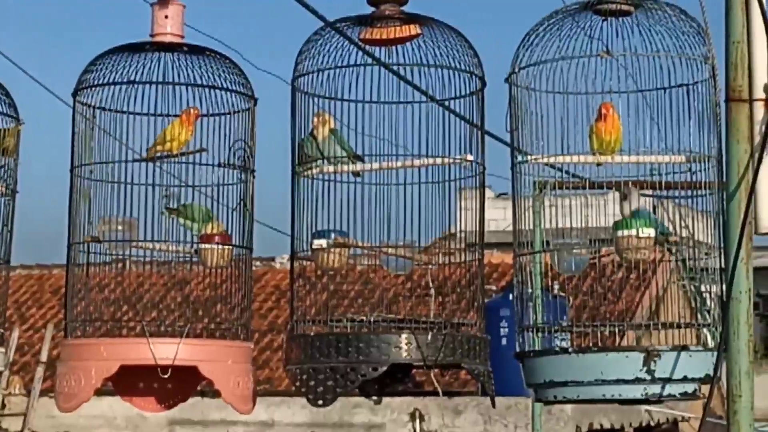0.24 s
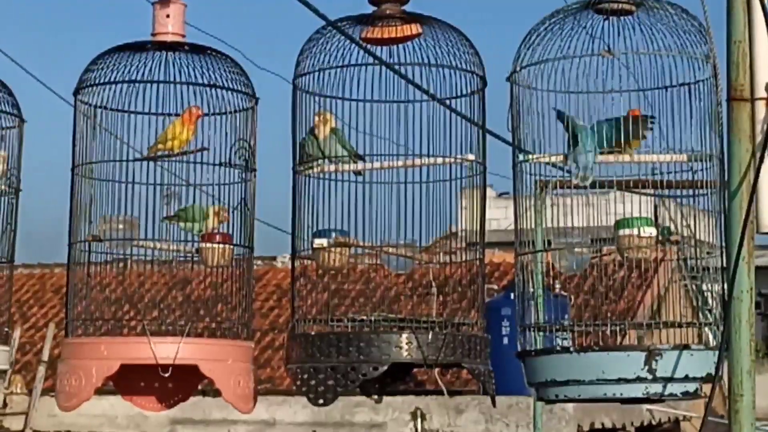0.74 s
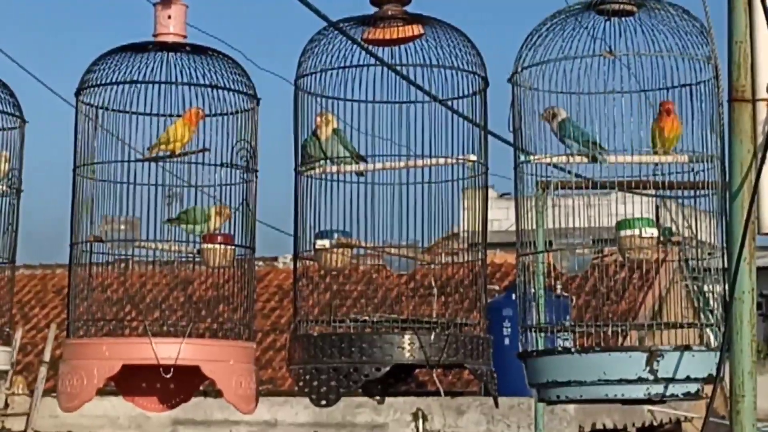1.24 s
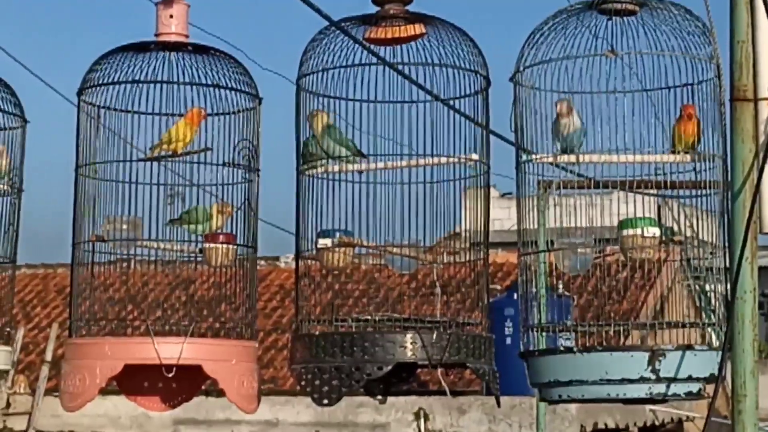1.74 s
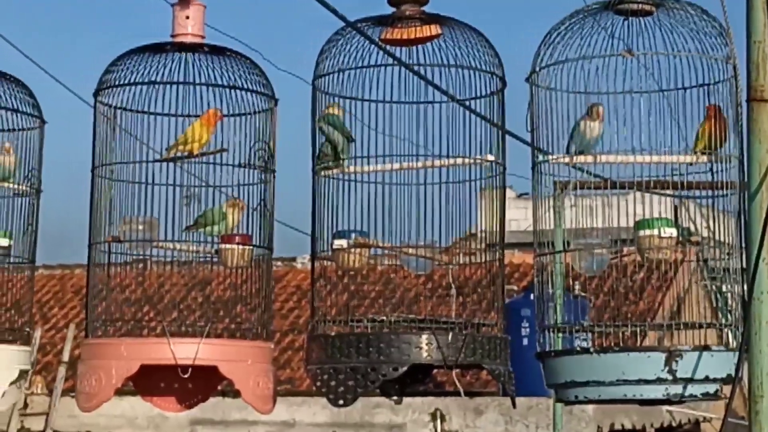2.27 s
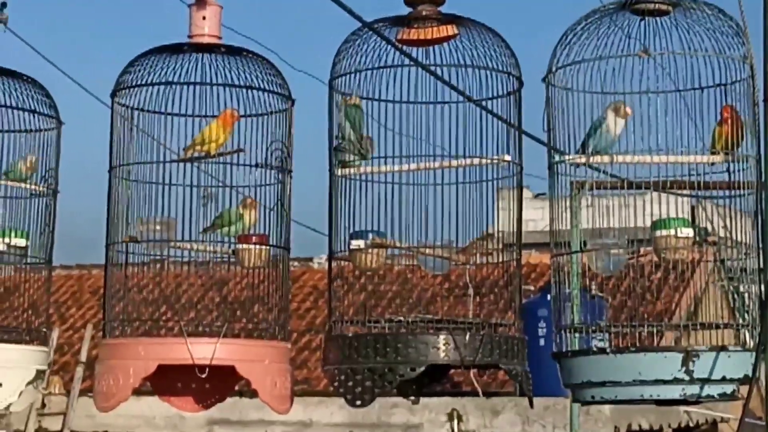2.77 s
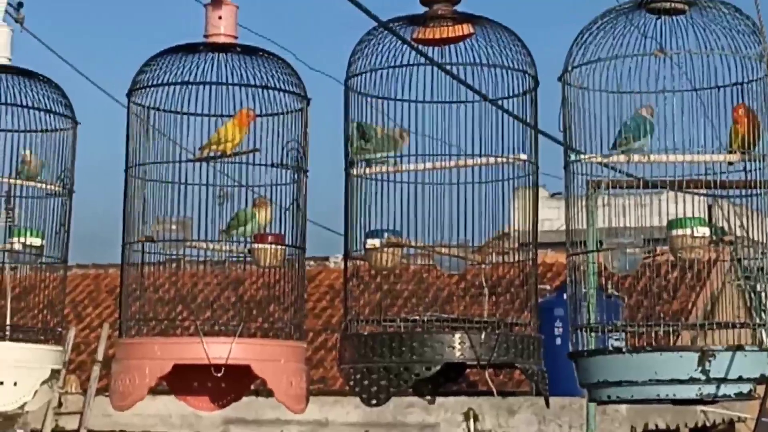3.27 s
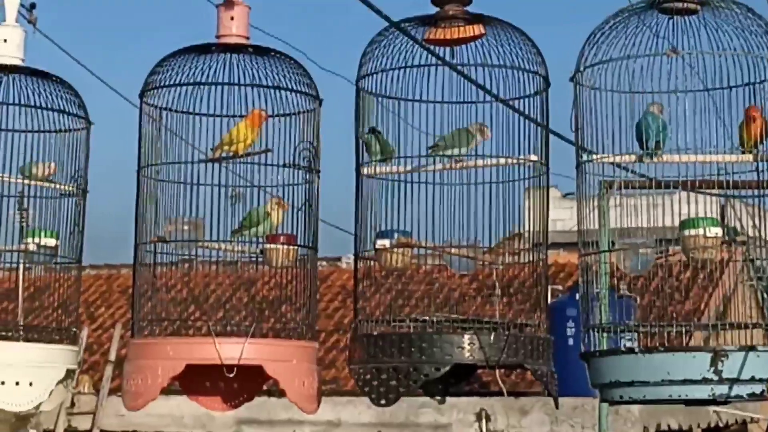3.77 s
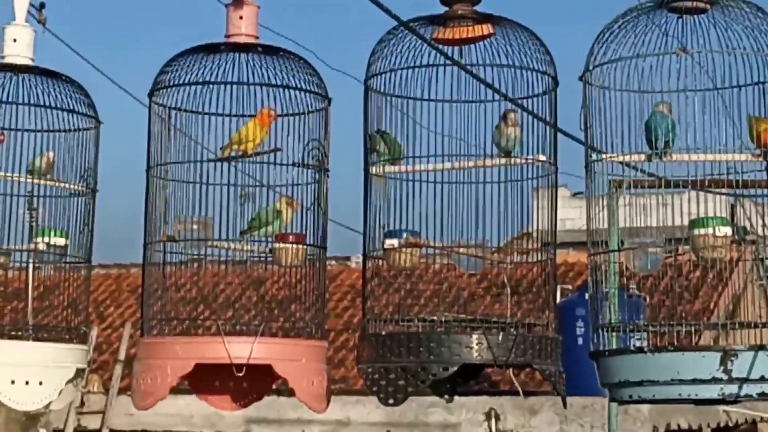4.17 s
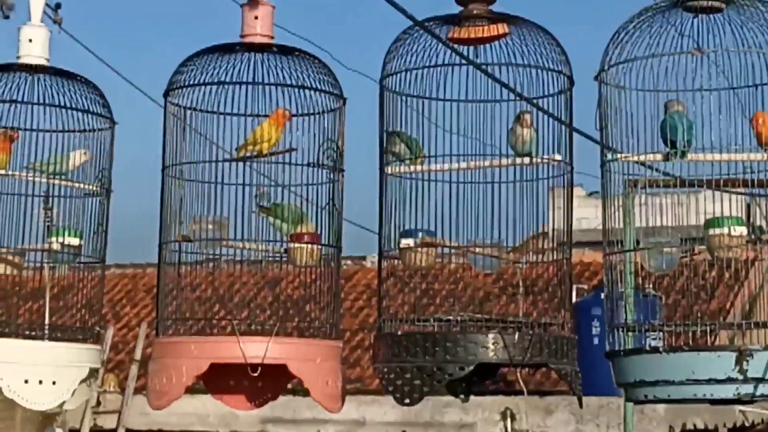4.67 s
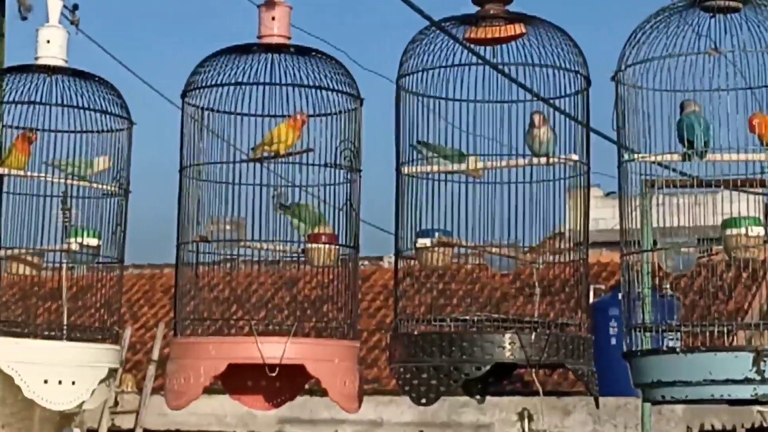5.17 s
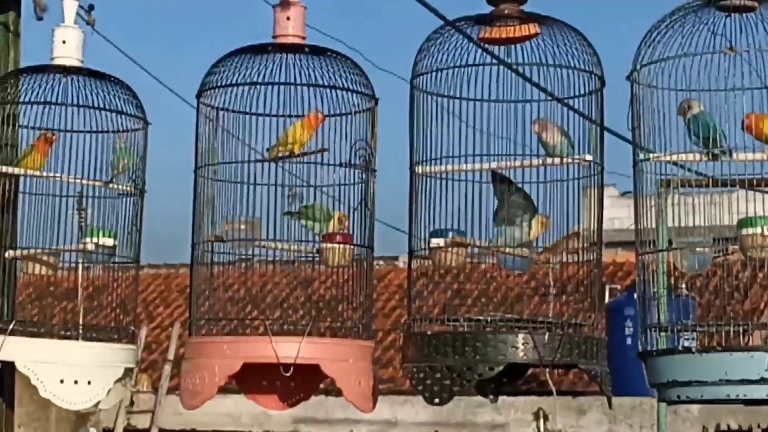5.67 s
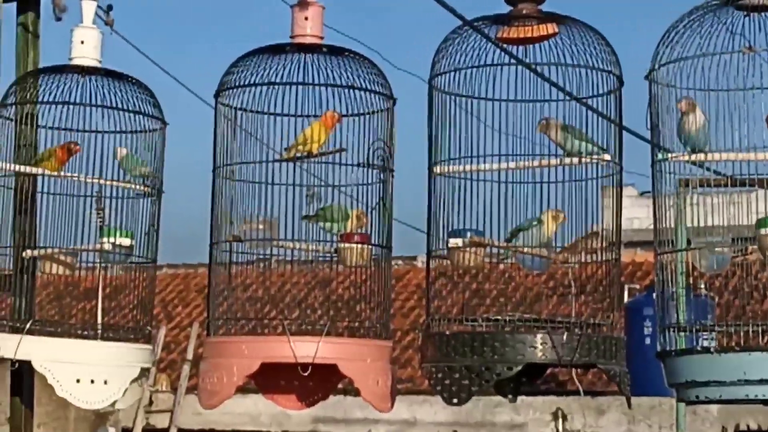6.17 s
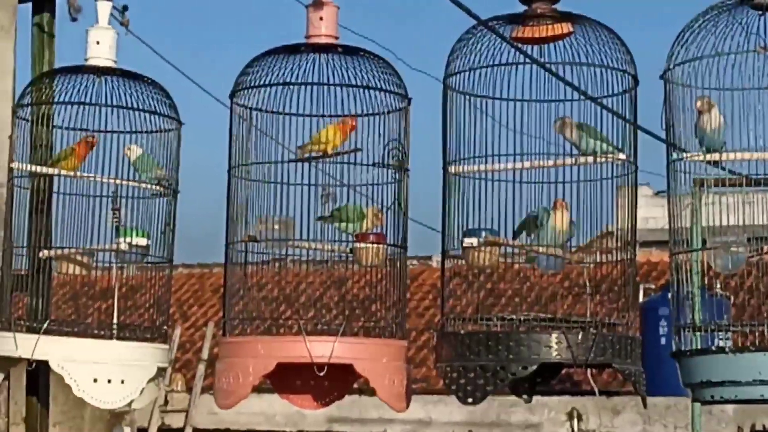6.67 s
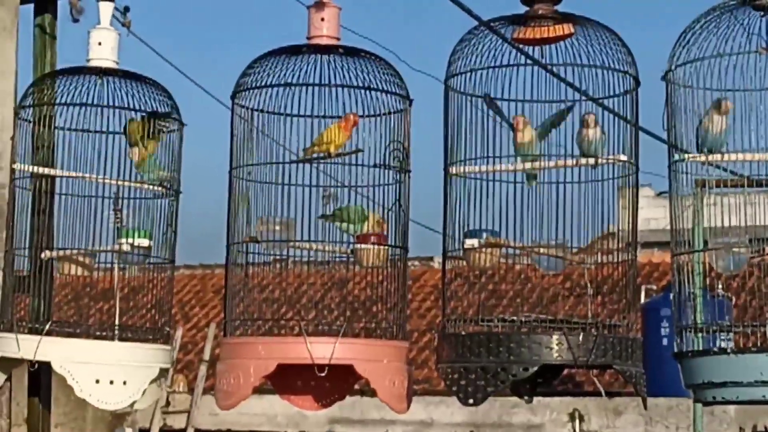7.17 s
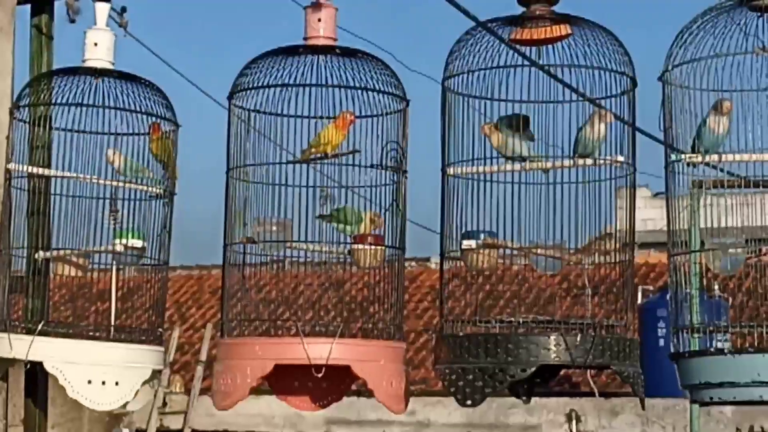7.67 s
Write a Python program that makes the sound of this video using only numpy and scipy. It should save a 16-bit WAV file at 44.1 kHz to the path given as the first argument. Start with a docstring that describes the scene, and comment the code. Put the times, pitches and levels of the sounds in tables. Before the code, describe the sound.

Several small lovebirds chirp close by on an open rooftop, shrill and raspy, each call a very quick zigzag of pitch. Separate calls come first, then a dense jumble, a sparser moment, steady repeated chirps, another short pause and a final even run. Walls and tiles return short blurred echoes. Far traffic hums faintly, and a motor drones softly late on. Bright stereo pickup with crisp treble.

```python
"""Caged lovebirds on a rooftop

Lovebirds chatter in bursts of shrill chirps: overtone tones on fast pitch glides, pulsed and raspy.
Walls and tiles throw them back as blurred single echoes and a tail of sparse decaying taps.
A hoarse bird squawks below, a distant one peeps as a falling sine, a noise puff scuffs a cage.
The town is shaped random spectra with a narrow hum and a passing motor's sine."""
import sys
import numpy as np
from scipy import signal
from scipy.fft import rfft, irfft
from scipy.io import wavfile
from scipy.ndimage import uniform_filter1d

SR = 44100
rng = np.random.default_rng(int(sys.argv[2]) if len(sys.argv) > 2 else 0)


def dump_mix(stems):
    """Bounce the given channels to the path in sys.argv[1] as a 16-bit WAV at rate SR."""
    frames = np.atleast_2d(stems).T  # one column per channel
    limited = np.clip(frames, -1, 1)  # hard clip at full scale
    pcm = np.round(limited * 32767).astype(np.int16)
    wavfile.write(sys.argv[1], SR, pcm)


N = 349272


def gain_of(db):
    """Decibels to amplitude gain."""
    return 10 ** (np.asarray(db) / 20)


def evened(x):
    """Scales to rms 1."""
    return x / np.sqrt(np.mean(x ** 2) + 1e-20)


def read(points, hz):
    """Interpolates (Hz, value) points on a log-frequency axis."""
    f, value = np.transpose(points)
    return np.interp(np.log(hz + 1), np.log(f + 1), value)


def wobble(count, hz):
    """Smooth random curve of rms 1 that changes at up to about hz."""
    pole = np.exp(-2 * np.pi * hz / SR)
    skipped = 500
    noise = rng.standard_normal(count + skipped)
    smooth = signal.lfilter([1], [1, -2 * pole, pole * pole], noise)
    return evened(smooth[skipped:])


def add(mix, start_s, sound, side_db):
    """Places a sound in both ports; the port on its side hears it louder and sooner."""
    for port, lean_db in enumerate((side_db / 2, -side_db / 2)):
        first = max(round(start_s * SR - lean_db), 0)  # one sample of lead per dB
        part = mix[port, first:][:len(sound)]
        part += gain_of(lean_db) * sound[:len(part)]


def syrinx(hz, level_db, unsteady, rasp):
    """A whistle along the curve hz; low notes are rich in overtones, and the tone comes in quick pulses."""
    # Throat resonance. Each row: frequency in Hz, relative level in dB.
    throat = [(1700, -6.5), (2200, -6), (3400, 3.5), (5000, 7), (8000, -0.5), (13000, -17), (16000, -20.5)]
    count = len(hz)
    hz = hz * (1 + unsteady * wobble(count, hz=430.0))
    turns = np.cumsum(hz) / SR
    slope_db = np.interp(hz, [1700, 2100, 3500], [-3, -7, -10])  # overtone roll-off by pitch
    order = np.arange(1, 10)[:, None]
    partials = gain_of(slope_db * (order - 1) ** 0.837 + read(throat, order * hz))
    partials *= order * hz < SR / 2.2  # no aliasing
    tone = (partials * np.cos(2 * np.pi * order * turns)).sum(0) / np.linalg.norm(partials, axis=0)
    pulse_hz = 300 * (1 + 0.297 * wobble(count, hz=40.41))
    pulses = 1 + 0.401 * np.cos(2 * np.pi * np.cumsum(pulse_hz) / SR)
    pulses += rasp * wobble(count, hz=1500)  # turbulent air spreads a rasp round every partial
    t = np.arange(count) / SR
    attack_s, release_s = .0045, .005
    edges = np.minimum(1, np.minimum(t / attack_s, t[::-1] / release_s))
    unsteady_db = level_db + 2.8 * wobble(count, hz=111.4)
    return np.sqrt(2) * gain_of(unsteady_db) * tone * pulses * edges


def chirp(rows):
    """A raspy glide that slows at each turning point; the syrinx's second voice grows with call length."""
    thin_db, thin_max_db = 0.146, 2.5  # loss in fast glides: dB per octave a second, at most
    s, hz, level_db = np.transpose(rows)
    index = np.arange(len(s))
    t = np.arange(s[0], s[-1], 1 / SR)
    step = np.interp(t, s, index)
    eased = step - .1 * np.sin(2 * np.pi * step)
    log_hz = np.interp(eased, index, np.log(hz))
    hz = np.exp(uniform_filter1d(log_hz, size=90, mode="nearest"))
    octaves_per_s = abs(np.gradient(np.log2(hz))) * SR
    level_db = np.interp(t, s, level_db) - np.minimum(thin_db * octaves_per_s, thin_max_db)
    strain = np.clip((s[-1] - s[0] - .03) / .05, .3, 1)
    # the other half of the syrinx wanders across the main voice
    other_hz = 4300 * np.exp(0.22 * wobble(len(t), hz=25.294))
    other = strain ** 2 * syrinx(other_hz, level_db - 10.5, unsteady=0.023, rasp=0.08)
    return syrinx(hz, level_db, unsteady=0.01928, rasp=0.0894) + other


def zigzag(start, lead, rise, fall, rebound, tail, low_hz, shoulder_hz, top_hz, dip_hz, rebound_hz,
           level_db, lead_db, rebound_db):
    """Turning points: low lead-in, shoulder, top, dip, rebound, sometimes a sagging tail; times in s."""
    shoulder_db, dip_db = 3, -2.5  # against the call's level
    lead_climb, lead_swell_db = 1.08, 3.5  # the lead-in creeps up and swells
    snap_max_s, climb_max_s = 0.013, 0.021  # lead-in to shoulder, shoulder to top
    dip_hold = 0.33  # share of the rebound time
    jump_time, jump_pitch = 0.18, .55  # shares of rebound time and climb in one quick jump, then it eases up
    top_free_hz, top_loss_db_per_khz = 5280, 1  # higher tops thin
    sag_share, sag_max_s = .65, 0.038  # a full sag drops to this share of the rebound pitch

    snap = min(snap_max_s, 0.52 * rise)
    climb = min(climb_max_s, .9 * (rise - snap))
    top_db = -top_loss_db_per_khz * max(top_hz - top_free_hz, 0) / 1e3
    jump_hz = dip_hz + jump_pitch * (rebound_hz - dip_hz)
    # each step: wait in s, pitch in Hz, level in dB over the call's
    steps = [(start, low_hz, lead_db - lead_swell_db),
             (lead, lead_climb * low_hz, lead_db),
             (snap, shoulder_hz, shoulder_db),
             (rise - snap - climb, shoulder_hz, shoulder_db),
             (climb, top_hz, top_db),
             (fall, dip_hz, dip_db),
             (dip_hold * rebound, dip_hz, dip_db),
             (jump_time * rebound, jump_hz, rebound_db),
             ((1 - dip_hold - jump_time) * rebound, rebound_hz, rebound_db)]
    if tail:
        sag = min(tail, sag_max_s)
        steps.append((sag, rebound_hz * sag_share ** (sag / sag_max_s), rebound_db))
        if tail > sag:
            steps.append((tail - sag, rebound_hz * sag_share, rebound_db + dip_db))
    wait, hz, db = np.transpose(steps)
    return np.transpose([np.cumsum(abs(wait)), hz, level_db + db])


def tweet(start, length, first_hz, bend_hz, last_hz, level_db, swell_db):
    """Turning points of a tweet with one bend; high ones open with a faint upward flick and a held pitch."""
    bend_at, ends_db = .38, -7.5  # share of the length; mean level of both ends against the bend
    high_hz, flick_from, flick_s, flick_db = 4990, 0.62, .004, -4.5  # flick_from: share of first_hz
    hold = 0.28  # share of the way to the bend
    first_db = level_db + ends_db - swell_db / 2
    last_db = level_db + ends_db + swell_db / 2
    bend_s = bend_at * length
    points = [(start, first_hz, first_db)]
    if first_hz > high_hz:
        points.insert(0, (start - flick_s, flick_from * first_hz, first_db + flick_db))
        points.append((start + hold * bend_s, first_hz, (first_db + level_db) / 2))
    return points + [(start + bend_s, bend_hz, level_db), (start + length, last_hz, last_db)]


def squawk(start, end, hz, level_db):
    """A low hoarse syrinx note whose pitch wanders."""
    count = round((end - start) * SR)
    wandering_hz = hz * (1 + 0.06 * wobble(count, hz=23.06))
    return syrinx(wandering_hz, level_db, unsteady=0.027, rasp=0.06)


def peep(hz):
    """A thin, very short sine that drops in pitch towards hz."""
    t = np.arange(0, .016, 1 / SR)
    turns = np.cumsum(hz * (1 + 0.091 * np.exp(-t / 0.0056))) / SR
    return np.sin(2 * np.pi * turns) * signal.windows.tukey(len(t), .3)


def knock():
    """A dull scuff: a short decaying puff of low noise."""
    t = np.arange(0, .05, 1 / SR)
    band = signal.butter(2, [500, 1500], "bandpass", fs=SR, output="sos")
    puff = signal.sosfilt(band, rng.standard_normal(len(t)))
    t60_s = 0.148
    return evened(puff) * gain_of(-60 * t / t60_s) / 2


def surfaces(x):
    """Single echoes off rough tiles, blurred and dull; each reaches the two ports at different times."""
    # Single surfaces. Each row: nominal delay in seconds, level in dB ahead of the dulling.
    echoes = [(.0025, -2.5), (.021, -14), (0.046, -24), (0.129, -27)]
    out = np.zeros_like(x)
    for delay_s, db in echoes:
        for port in range(2):
            lag = round(delay_s * rng.uniform(.95, 1.05) * SR)
            tiles = rng.standard_normal(lag // 5 + 1)  # far surfaces spread the echo more
            blurred = signal.oaconvolve(x[port], tiles / np.linalg.norm(tiles))
            out[port, lag:] += gain_of(db) * blurred[:N - lag]
    dull_hz = 7000
    return signal.sosfilt(signal.butter(2, dull_hz, fs=SR, output="sos"), out)


def walls(x):
    """Sparse taps of random sign, each band dying at its own speed; three sets fade in and out in turn."""
    # Reverberation. Each row: frequency in Hz, T60 in seconds.
    decay = [(1500, 0.43), (4000, 0.424), (14000, 0.22)]
    clumps_db, clumps_hz = 1.5, 26.3  # echoes come back in uneven clumps
    turn_hz, spacing, length = 1.3, 20, SR // 2  # spacing and length in samples
    out, t = np.zeros_like(x), np.arange(N) / SR
    for k in range(3):
        taps = np.zeros((2, length))
        grid = np.arange(60, length - spacing, spacing)
        at = grid + rng.integers(0, spacing, (2, (length - 61) // spacing))
        np.put_along_axis(taps, at, rng.choice([-1., 1.], at.shape), 1)
        taps *= 1 + 2 * np.exp(-np.arange(length) / SR / .04)  # near cages and tiles answer first
        taps *= gain_of([clumps_db * wobble(length, clumps_hz) for port in taps])
        hz, lag_s, z = signal.stft(taps, SR, nperseg=128)
        z = z * gain_of(-60 * lag_s / read(decay, hz)[:, None])
        tail = signal.istft(z, SR, nperseg=128)[1]
        tail = tail / np.linalg.norm(tail[0])
        turn = np.sqrt(2 / 3) * np.cos(2 * np.pi * turn_hz * t + np.pi * k / 3)
        out += signal.fftconvolve(x * turn, tail, axes=1)[:, :N]
    return out


def town_wash():
    """Far traffic: random short-time spectra with slow level patches, more alike left and right in the bass."""
    # Spectrum shape. Each row: frequency in Hz, relative density in dB per Hz.
    spectrum = [(50, -41.5), (80, -9.5), (145, -1.5), (390, -18), (760, -26), (1300, -33), (2800, -35),
                (7500, -48.5), (13000, -50.5)]
    # Each row: frequency in Hz, left-right likeness (1 = identical).
    likeness = [(60, 0.83), (130, 0.979), (290, 0.806), (640, 0.146), (1400, 0)]
    frames, hz = N // 512 + 5, np.fft.rfftfreq(2048, 1 / SR)
    a, b, c, d, patches = rng.standard_normal((frames, 1025, 5)).T
    patches = uniform_filter1d(patches, size=20, axis=0)  # over bins
    patches = evened(uniform_filter1d(patches, size=8, axis=1))  # over frames
    same = np.clip(read(likeness, hz), -1, 1)[:, None]
    left = a + 1j * b
    right = same * left + np.sqrt(1 - same ** 2) * (c + 1j * d)
    z = np.array([left, right]) * gain_of(read(spectrum, hz)[:, None] + 0.9 * patches)
    wash = signal.istft(z, nperseg=2048, noverlap=1536)[1][:, :N]
    wash_db = -47
    return gain_of(wash_db) * evened(wash)


def town_hum():
    """A narrow noise band: two quadrature carriers with random envelopes."""
    # Centre in Hz, width in Hz, level in dB.
    hum_hz, width_hz, hum_db = (144, 4.9, -60.5)
    phase = 2 * np.pi * hum_hz * np.arange(N) / SR
    hum = wobble(N, width_hz) * np.cos(phase) + wobble(N, width_hz) * np.sin(phase)
    return gain_of(hum_db) * hum


def motor():
    """A passing motor: a sine that rises, fades and wavers in level."""
    # Each row: time in seconds, mean level in dB.
    drone = [(5.398, -63), (6.3, -49.5), (6.8, -62.5)]
    motor_hz = 257
    t = np.arange(N) / SR
    s, drone_db = np.transpose(drone)
    level_db = np.interp(t, s, drone_db, -120, -120) + 4.4 * wobble(N, hz=4.6)
    return gain_of(level_db) * np.sin(2 * np.pi * motor_hz * t)


def through_ports(air):
    """Two microphone ports, each with its own treble response; the left one has a cavity resonance."""
    # Port responses. Each row: frequency in Hz, gain in dB.
    left_port = [(5000, -2), (7000, -2), (10000, 6.5), (12000, 35), (13500, 25.5), (15500, 6)]
    right_port = [(5000, -0.5), (7000, 3), (9000, 2), (12000, 18), (15500, 6.5)]
    right_late_s = .00005  # the right port hears everything in the air slightly later
    hz = np.fft.rfftfreq(N, 1 / SR)
    delay = np.exp(-2j * np.pi * np.outer([0, right_late_s], hz))
    ports = gain_of([read(left_port, hz), read(right_port, hz)]) * delay
    return irfft(rfft(air) * ports, N)


def scene():
    """Near birds, the far bird and the knock with their echoes, through the two ports, over the town."""
    # Zigzag calls. Each row: start, lead, rise, fall, rebound and tail in seconds, low, shoulder, top, dip
    # and rebound pitch in Hz, level in dB, lead-in and rebound level in dB over it.
    zigzags = [ (0.0, 0.00186, 0.0311, 0.02, 0.014, 0.036, 2102, 5166, 5756, 3130, 5748, -31.5, 2.5, 0),
               (0.636, 0.01108, 0.0301, 0.012, 0.046, 0, 2000, 4220, 4300, 3528, 4100, -36, 1, -7),
               (0.815, 0.0215, 0.035, 0.012, 0.024, 0.01, 1670, 4440, 4302, 3025, 4465, -31.5, -3.5, 4.5),
               (0.988, 0.0183, 0.0332, 0.015, 0.025, 0.0009, 1577, 4387, 4502, 3545, 4400, -35.5, -1.5, 7),
               (1.172, 0.0233, 0.0201, 0.02, 0.037, 0, 1455, 4227, 4900, 3466, 4516, -36, -8.5, 2),
               (3.267, 0.0105, 0.01833, 0.024, 0.029, 0.026, 1942, 5000, 6862, 3357, 5208, -27.5, -6.5, 3.5),
               (3.459, 0.00265, 0.0275, 0.021, 0.033, 0.00075, 2100, 4900, 6770, 3461, 4654, -29.5, 0, 3.5),
               (3.527, 0.0118, 0.0305, 0.018, 0.036, 0.0016, 2150, 4600, 6636, 3270, 5000, -29, -5.5, 6.5),
               (3.703, 0.01675, 0.0212, 0.027, .032, 0.058, 2050, 4209, 6496, 3355, 4694, -24.5, -7, -5.5),
               (4.071, 0.01198, 0.026, 0.013, 0.048, 0, 1978, 4530, 6670, 3264, 5230, -26, -11, 0.5),
               (4.235, 0.00974, 0.0271, 0.018, 0.015, 0.015, 1970, 4400, 6360, 3490, 4240, -26, -6.5, 2),
               (5.085, 0.00894, 0.0319, 0.015, 0.016, 0.0117, 2050, 4150, 6426, 2986, 4906, -27, -8, -1),
               (5.221, 0.00694, 0.04, 0.011, 0.012, 0, 1973, 4389, 6097, 2634, 4974, -27, -6, -1.5),
               (5.356, 0.01215, 0.0245, 0.017, 0.036, 0, 1950, 4511, 4700, 2888, 3384, -27, -2.5, -4.5),
               (5.509, 0.0126, 0.0318, 0.02, 0.031, 0, 1946, 4380, 5679, 3545, 4617, -25, -4.5, -2.5),
               (5.66, 0.0268, 0.0325, 0.023, 0.026, 0.013, 1660, 4134, 5335, 3315, 4366, -26, -11.5, -2.5),
               (5.83, 0.027, 0.045, 0.016, 0.00164, 0.0062, 1560, 4383, 4865, 3328, 3315, -26.5, -8, 1.5),
               (5.87, 0.01466, 0.0349, 0.015, 0.039, 0.0018, 1800, 3195, 4470, 2999, 4330, -28.5, -6.5, 1.5),
               (6.68, 0.032, 0.04155, 0.018, 0.037, 0, 1630, 3260, 4890, 3241, 4013, -27, -5.5, -3),
               (6.873, 0.03005, 0.03485, 0.017, 0.028, 0.0018, 1680, 3614, 4700, 3218, 3987, -28, -6.5, -1.5),
               (7.063, 0.01633, 0.0322, 0.024, 0.033, 0, 1690, 4246, 5165, 3345, 4220, -24, -11.5, -2.5),
               (7.222, 0.02033, 0.03195, 0.026, 0.03, 0.0066, 1700, 4253, 5226, 3348, 4384, -22.5, -13, -6.5),
               (7.31, 0.0458, 0.0168, 0.0055, 0.0086, 0.0031, 1730, 3497, 3980, 3390, 5320, -39, 1, 11),
               (7.397, 0.02386, 0.0283, 0.03, 0.037, 0.0014, 1680, 3817, 5440, 3258, 4216, -23.5, -12, -1.5),
               (7.588, 0.02356, 0.0347, 0.025, 0.029, 0.012, 1800, 4420, 5850, 3424, 4438, -24, -9, -4), ]
    # Tweets. Each row: start and length in seconds, first, bend and last pitch in Hz, level in dB,
    # swell from first to last in dB.
    tweets = [ (0.679, 0.031, 5920, 5270, 5270, -27, 7.5), (0.762, 0.01914, 5350, 5170, 5240, -21.5, -3),
              (0.85, 0.027, 5140, 5000, 5370, -23, -9), (1.315, 0.027, 5930, 5060, 4820, -29.5, 3),
              (1.555, 0.035, 5980, 4880, 4300, -24.5, -1.5), (1.607, 0.021, 5380, 5060, 5120, -24, 0),
              (2.349, 0.028, 6200, 4945, 5100, -28, 8), (2.56, 0.036, 6495, 4990, 5510, -24.5, 8.5),
              (2.711, 0.029, 6600, 5260, 5250, -39.5, 9), (2.752, 0.023, 6430, 5140, 5630, -21, 9.5),
              (2.816, 0.037, 4600, 3900, 4080, -33, -6.5), (2.847, 0.022, 4410, 4540, 4680, -26.5, -2.5),
              (2.926, 0.032, 6540, 5060, 5640, -20, 11.5), (2.931, 0.062, 1799, 2750, 2954, -41, -5),
              (2.987, 0.034, 4520, 3304, 3530, -28, -11), (3.071, 0.0226, 5958, 5850, 3066, -29.5, 2),
              (3.117, 0.063, 2176, 3750, 2920, -31, -7.5), (3.129, 0.0384, 5390, 4690, 4900, -26, -5),
              (3.373, 0.02, 3930, 4400, 5190, -18.5, -20.5), (3.54, 0.062, 4600, 5530, 5400, -37.5, -12.5),
              (3.74, 0.04, 3700, 2950, 3557, -25, 3.5), (4.308, 0.07, 2925, 3490, 4220, -31.5, -15),
              (4.315, 0.11, 4460, 4590, 4320, -30.5, -4), (4.387, .04, 2372, 4429, 4300, -26.5, 4),
              (5.26, 0.04, 4290, 4830, 6070, -24.5, 3.5), (5.369, 0.058, 6560, 6150, 6460, -33, -8.5),
              (5.42, 0.076, 3900, 4600, 4220, -25, -8), (5.382, 0.032, 4600, 4850, 5050, -27, 2),
              (5.455, 0.028, 1900, 3200, 3500, -25.5, 10), (5.771, 0.066, 3390, 2936, 3300, -32, -12),
              (6.464, 0.077, 2675, 4690, 2960, -48.5, 9.5), (7.556, 0.032, 4200, 5260, 4000, -35.5, 1.5), ]
    # Free warbles, a list of turning points each. Each point: time in seconds, pitch in Hz, level in dB.
    warbles = [
        [(1.674, 3840, -13.5), (1.68, 2973, -26), (1.692, 3900, -28), (1.701, 3013, -27.5), (1.71, 4600, -30),
         (1.728, 4000, -23), (1.738, 5524, -41.5), (1.746, 4223, -30.5), (1.752, 2158, -30),
         (1.76, 2176, -38.5), (1.777, 2346, -36.5), (1.788, 3508, -29.5), (1.8, 3680, -46)],
        [(1.805, 3999, -23.5), (1.812, 3355, -23), (1.82, 3059, -34.5), (1.827, 3419, -36), (1.84, 3346, -33.5),
         (1.865, 3690, -72.5)],
        [(3.621, 4966, -22), (3.634, 4329, -30), (3.672, 4477, -28.5), (3.684, 4773, -22.5),
         (3.692, 4180, -29.5), (3.703, 5023, -23.5), (3.71, 6050, -44.5), (3.732, 5240, -25.5)],
    ]
    # Another bird's squawks. Each row: start and end in seconds, mean pitch in Hz, level in dB.
    squawks = [(3.798, 3.823, 2264, -39.5), (4.259, 4.457, 2252, -40.5), (5.641, 5.738, 2146, -37),
               (5.763, 5.8, 2237, -37.5), (7.738, 7.795, 1596, -55)]
    # Far bird. Each row: start in seconds, gain in dB, pitch it falls towards in Hz.
    peeps = [(5.038, -52, 7820), (6.074, -43.5, 7436), (6.2783, -40, 7648), (6.494, -39, 7572),
             (7.83, -39, 7415)]
    # Scuffs against a cage. Each row: start in seconds, gain in dB.
    knocks = [(4.633, -46.5)]

    near, far = np.zeros((2, N)), np.zeros((2, N))
    for rows in [tweet(*row) for row in tweets] + [zigzag(*row) for row in zigzags] + warbles:
        add(near, rows[0][0], chirp(rows), 2 * rng.standard_normal())  # perches lie left and right
    for row in squawks:
        add(near, row[0], squawk(*row), 0)
    for s, db, hz in peeps:
        add(far, s, gain_of(db) * peep(hz), -6)
    for s, db in knocks:
        add(far, s, gain_of(db) * knock(), 0)
    small_beak = signal.butter(4, 1450, "highpass", fs=SR, output="sos")  # radiates no bass
    direct = signal.sosfilt(small_beak, near) + far
    air = direct + surfaces(direct) + gain_of(-6.0) * walls(direct)
    return through_ports(air) + town_wash() + town_hum() + motor()


def record(dry):
    """Band limit: a steep linear-phase low-pass."""
    edge_hz = 16050
    lowpass = signal.firwin(1023, edge_hz, window=("kaiser", 9), fs=SR)
    return signal.oaconvolve(dry, lowpass[None], "same")


dry = scene()
out = record(dry)
dump_mix(out)
```